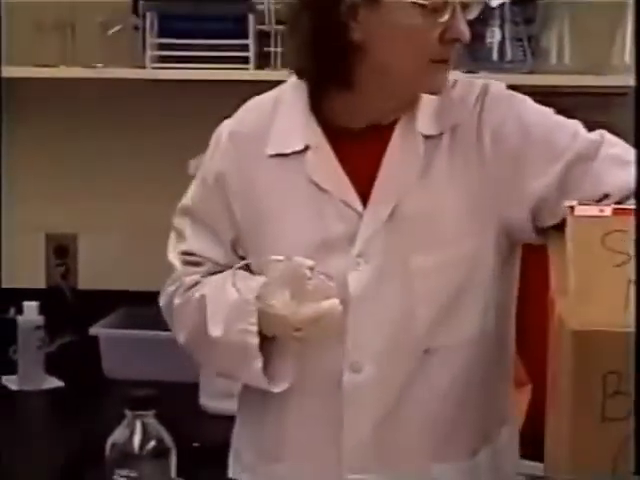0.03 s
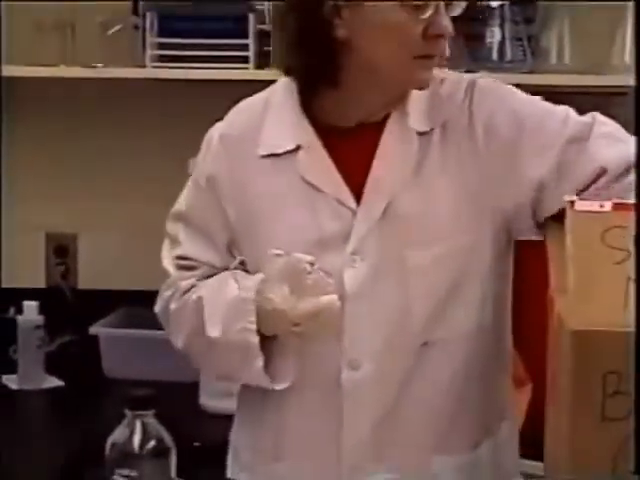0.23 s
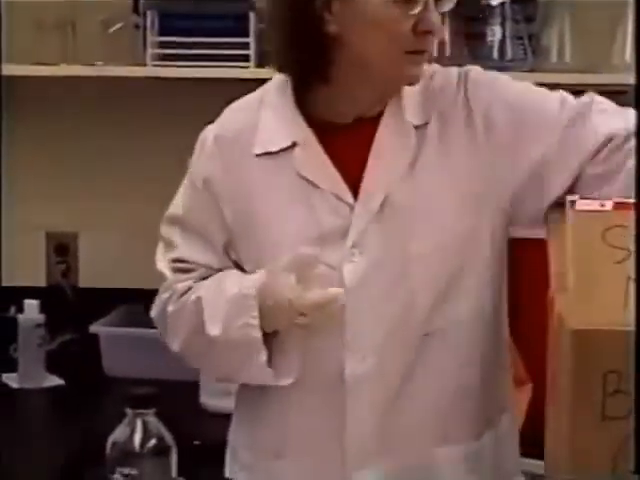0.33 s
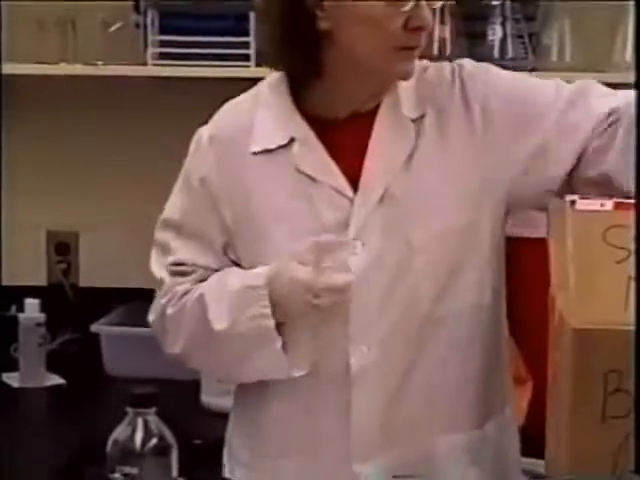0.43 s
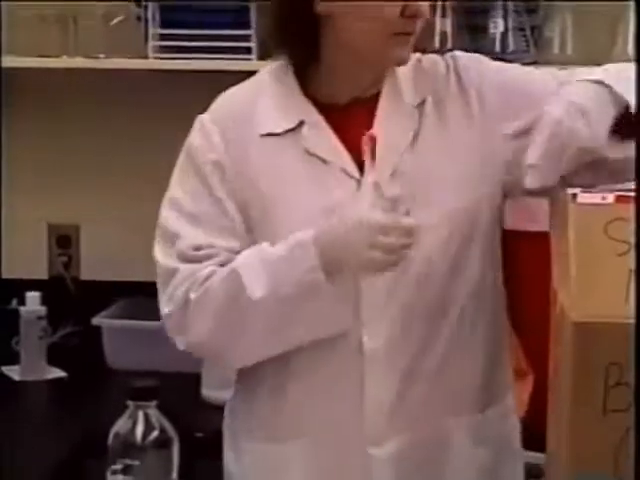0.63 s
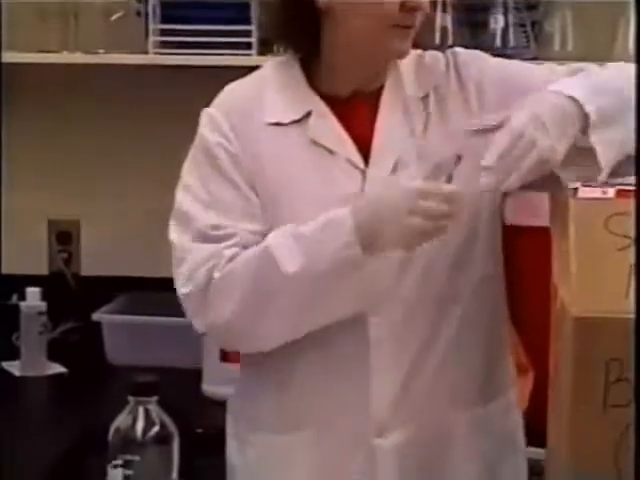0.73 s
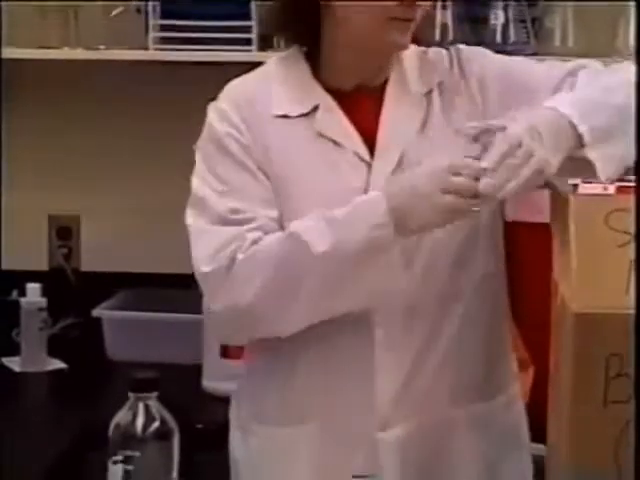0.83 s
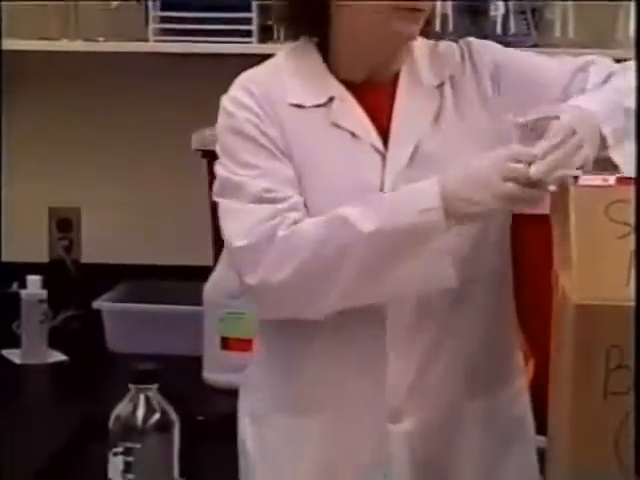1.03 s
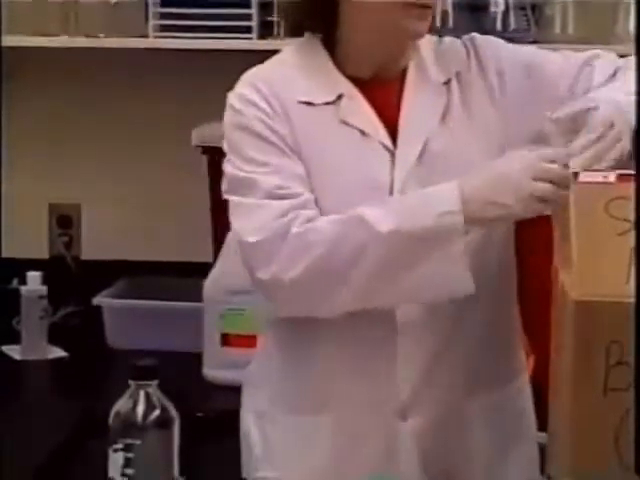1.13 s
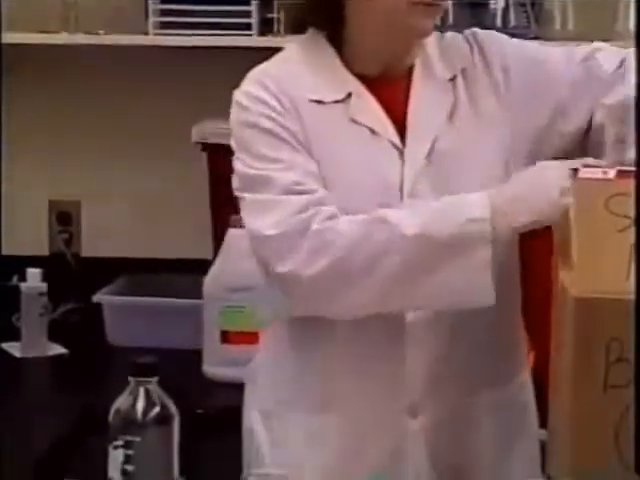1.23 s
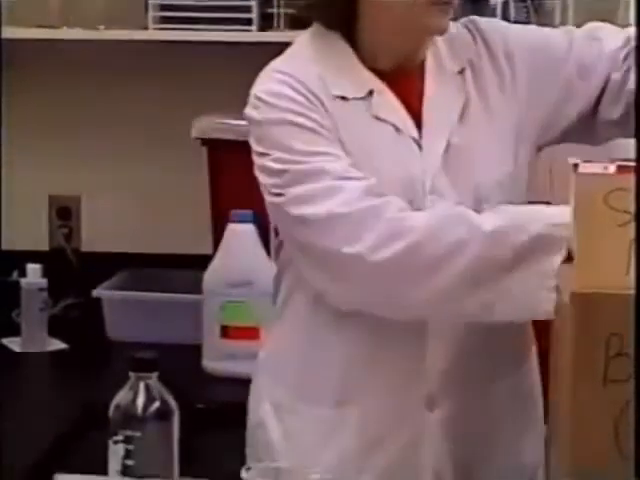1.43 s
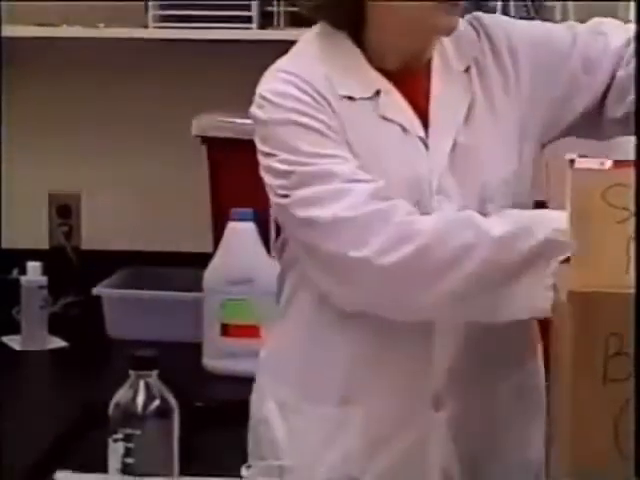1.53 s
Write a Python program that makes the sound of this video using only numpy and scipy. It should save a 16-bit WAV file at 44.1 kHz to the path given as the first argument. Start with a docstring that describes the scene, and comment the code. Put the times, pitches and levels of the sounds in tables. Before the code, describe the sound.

Glassware drops into a cardboard box. After a soft sleeve swish, hollow knocks and ringing clinks begin at about 0.2 seconds, are loudest near 0.35 and settle by 0.6. A faint rustle follows, then two small glassy ticks with light glove rubbing at about 0.9 and 1.0 seconds. Low ventilation hums throughout in the slightly echoing laboratory.

```python
"""Hard-walled laboratory: a piece of glassware is dropped into a tall cardboard waste box.
A sleeve swishes; the glass thumps down through the box, whose walls boom, rings on other glass
and is damped as it settles. Two small glassy ticks follow as gloved hands take the next item.
Ventilation hums throughout."""
import sys
import numpy as np
from scipy import signal
from scipy.fft import rfft, irfft
from scipy.io import wavfile

SR = 44100
rng = np.random.default_rng(int(sys.argv[2]) if len(sys.argv) > 2 else 0)


def unload_audio(sound):
    """Save the sound as a 16-bit wav file, at the path given as the first command line argument."""
    columns = np.transpose(np.atleast_2d(sound))
    # keep every value between -1 and 1, then stretch to whole-number steps
    steps = np.round(np.clip(columns, -1, 1) * 32767)
    wavfile.write(sys.argv[1], SR, steps.astype(np.int16))


N = 70560
T = np.arange(N) / SR

# knocks on box and contents: t/s, level/dB, treble slope/(dB/oct), boom/dB, boom f/Hz, thump/dB
BOX_KNOCKS = [(.193, -16.5, -3, -20, 292.5, -60), (0.208, -22, -0.5, -32, 285, -61),
              (0.236, -17, -2.5, -17.5, 234.3, -50), (.249, -22, 2.3, -37.5, 243, -28),
              (0.346, -8.5, -0.04, -15, 262, -33.5), (.361, -13, 0.57, -25, 268.6, -40),
              (0.398, -29.5, 2, -27, 286, -52), (.435, -22, 1, -18.5, 268.3, -54),
              (.45, -22.5, 2.5, -21.5, 272.6, -49), (.483, -21, -26, -43, 270, -65),
              (0.507, -28, -13, -24.5, 278.7, -68), (0.549, -33.5, -17, -36, 262, -49)]
# room decay: f/Hz, t60/s
ROOM_DECAY = [(100, 0.78), (500, 0.51), (2000, 0.53), (9000, 0.33)]


def from_db(db):
    """Decibels to gain."""
    return 10 ** (np.asarray(db) / 20)


def at_hz(points, hz):
    """Interpolate a table over log frequency."""
    table_hz, values = np.transpose(points)
    return np.interp(np.log(hz), np.log(table_hz), values)


def noise_bands():
    """Third-octave noise: centres/Hz, widths/Hz, unit-rms signals."""
    edges = np.geomspace(22, 11300, 28)
    hz = np.fft.rfftfreq(N, 1 / SR)
    white = rfft(rng.standard_normal(N))
    bands = np.array([irfft(white * ((hz >= lo) & (hz < hi)), N) for lo, hi in zip(edges, edges[1:])])
    return np.sqrt(edges[1:] * edges[:-1]), np.diff(edges), bands / bands.std(axis=1, keepdims=True)


def band_gains(colour, hz, width_hz, tilt_db_oct=0):
    """Band gains of unit total power from a colour (f/Hz, relative density/dB)."""
    gains = from_db(at_hz(colour, hz) + tilt_db_oct * np.log2(hz)) * np.sqrt(width_hz)
    return gains / np.linalg.norm(gains)


def strike(start_s, rise_s, t60_s):
    """Envelope: fast rise, exponential decay."""
    age_s = np.maximum(T - start_s, 0)
    return (1 - np.exp(-age_s / rise_s)) * np.exp(-np.log(1000) * age_s / t60_s)


def tone(hz, zero_phase_s, waver, width_hz):
    """Sine of rms near 1; amplitude and phase waver among reflections."""
    offset_hz = np.fft.fftfreq(N, 1 / SR)
    white = rng.standard_normal(N) + 1j * rng.standard_normal(N)
    drift = np.fft.ifft(np.fft.fft(white) / (1 + (offset_hz / width_hz) ** 2))
    carrier = np.exp(2j * np.pi * hz * (T - zero_phase_s))
    return np.sqrt(2 / (1 + waver ** 2)) * np.imag((1 + waver * drift / drift.std()) * carrier)


def room(x):
    """Diffuse reverberation off the hard walls."""
    hz, width_hz, bands = noise_bands()
    tail = 0
    for band, band_hz, t60_s in zip(bands, width_hz, at_hz(ROOM_DECAY, hz)):
        decay = strike(0.004, 0.012, t60_s) / np.linalg.norm(strike(0.004, 0.0025, t60_s))
        tail += band * np.sqrt(2 * band_hz / SR) * decay
    return signal.fftconvolve(x, tail)[:N]


def ventilation():
    """Steady air noise and two fan tones."""
    # air noise and hiss: f/Hz, relative density/dB
    air_colour = [(15, -34), (25, -13.5), (60, -20), (106, -13), (237, -7), (268, -15.5), (297, 5.5),
                  (328, -27.5), (371, -12.5), (628, -13), (960, -17.5), (1110, -15.5), (9800, -34),
                  (12700, -86), (21600, -120)]
    # fan tones: f/Hz, level/dB
    fan_tones = [(296.5, -53), (1422, -60.5)]
    hz, width_hz, bands = noise_bands()
    air = from_db(-45.5) * (band_gains(air_colour, hz, width_hz) @ bands)
    return air + sum(from_db(db) * tone(fan_hz, 0, waver=0.16, width_hz=2.3) for fan_hz, db in fan_tones)


def rustles(scatter_db=2.0):
    """Sleeve and gloves rub: noise bursts that swell and fade."""
    # rubs: peak t/s, level/dB, rise/s, t60/s, tilt/(dB/oct)
    rubs = [(0.093, -34.5, 0.096, 0.41, -6.5), (.68, -42, .05, .4, -4.5), (0.893, -36, 0.0036, 0.34, -1),
            (0.991, -41.5, 0.0025, 0.31, 1.4), (1.003, -48, 0.0044, 0.4, -3.5)]
    # cloth and rubber friction: f/Hz, relative density/dB
    rub_colour = [(25, -52), (120, -27.5), (400, -6.5), (1000, -9.5), (1800, -2.5), (3100, -3), (5000, -1),
                  (7000, -6.5), (10000, -5.5)]
    hz, width_hz, bands = noise_bands()
    out = 0
    for peak_s, db, rise_s, t60_s, tilt_db_oct in rubs:
        swell = np.exp(2 * np.minimum(T - peak_s, 0) / rise_s)
        fade = from_db(-60 * np.maximum(T - peak_s, 0) / t60_s)
        gains = band_gains(rub_colour, hz, width_hz, tilt_db_oct)
        gains *= from_db(scatter_db * rng.standard_normal(len(hz)))
        out += from_db(db) * swell * fade * (gains @ bands)
    return out


def ticks(bump_db=-48):
    """Small glass pieces touch: a thin ring over a soft low bump of the hands."""
    # touches: t/s, level/dB, tilt/(dB/oct)
    touches = [(.891, -38, 2.5), (.991, -48, 11)]
    # modes of the pieces: f/Hz, relative level/dB, t60/s
    modes = [(1583, -11, .45), (2570, 1, .16), (3052, 1, .26), (3171, -7, .22), (3566, -6, .32),
             (3909, -5, .22), (4227, -10, .35), (4620, -8, .25), (4940, -4, .2), (6174, -8, .25),
             (7275, -8, .2)]
    pivot_hz, first_s = modes[2][0], touches[0][0]
    ring = 0
    for hz, mode_db, t60_s in modes:
        octaves = np.log2(hz / pivot_hz)
        envelope = sum(from_db(db + mode_db + tilt_db_oct * octaves) * strike(t_s, 0.0035, t60_s)
                       for t_s, db, tilt_db_oct in touches)
        ring += envelope * tone(hz, first_s, waver=1.0, width_hz=58)
    hz, width_hz, bands = noise_bands()
    bump = band_gains([(25, -1), (60, -1), (150, -18), (500, -64)], hz, width_hz) @ bands
    return ring + from_db(bump_db) * bump * sum(strike(t_s, 0.0032, 0.27) for t_s, *_ in touches)


def bottle(struck_s=0.349):
    """A bottle lying in the box rings with the heaviest knock."""
    # bottle modes: f/Hz, level/dB, t60/s
    modes = [(1031, -22, 0.56), (1218, -21.5, 0.18), (2050, -18, 0.2), (2106, -23.5, 0.21)]
    return sum(from_db(db) * strike(struck_s, 0.0044, t60_s) * tone(hz, struck_s, waver=0.45, width_hz=25)
               for hz, db, t60_s in modes)


def box(room_db=-11):
    """The struck wall booms, higher modes join in and the whole box thumps."""
    # higher box modes: f/Hz, level re knock/dB, t60/s
    modes = [(403.5, -12.5, 0.18), (493.5, -12.5, 0.093), (612.6, -6, 0.12), (745, -10.5, 0.073),
             (863.3, -13.5, 0.27), (929, -8.5, 0.1), (1106.4, -12, 0.079)]
    hz, width_hz, bands = noise_bands()
    thump_colour = [(25, -7), (70, -17.5), (130, -6.5), (250, -10), (800, -70)]
    thump = band_gains(thump_colour, hz, width_hz) @ bands
    out = 0
    for t_s, _, _, boom_db, boom_hz, thump_db in BOX_KNOCKS:
        boom = tone(boom_hz, t_s, waver=0.21, width_hz=28)
        out += from_db(boom_db) * strike(t_s, rise_s=0.0028, t60_s=0.22) * boom
        out += from_db(thump_db) * strike(t_s, rise_s=0.0064, t60_s=0.33) * thump
    for mode_hz, mode_db, t60_s in modes:
        power = sum((from_db(db + mode_db) * strike(t_s, 0.0025, t60_s)) ** 2
                    for t_s, db, *_ in BOX_KNOCKS)
        out += np.sqrt(power) * tone(mode_hz, 0, waver=0.27, width_hz=16)
    return out + from_db(room_db) * room(out)


def knocks(rise_s=0.00072, crack_gain=0.28, treble_from_hz=590, room_db=-2.5):
    """Impacts excite dense, short-lived modes of cardboard and contents; hardness sets the treble."""
    # knock spectrum: f/Hz, relative density/dB
    knock_colour = [(60, -40), (140, -15.5), (230, -2.5), (450, -3), (700, -1), (1000, -3), (1550, -7.5),
                    (2200, -8.5), (3000, -15), (5000, -21), (7000, -26), (10000, -34)]
    hz, width_hz, bands = noise_bands()
    colour_gains = band_gains(knock_colour, hz, width_hz)
    treble_oct = np.log2(np.maximum(hz / treble_from_hz, 1))
    band_power = 0
    for t_s, db, slope_db_oct, *_ in BOX_KNOCKS:
        gains = from_db(db + slope_db_oct * treble_oct) * colour_gains
        envelope = strike(t_s, rise_s, t60_s=0.18) + crack_gain * strike(t_s, rise_s, t60_s=0.01)
        band_power += np.outer(gains, envelope) ** 2
    direct = (bands * np.sqrt(band_power)).sum(axis=0)
    return direct + from_db(room_db) * room(direct)


def glass(rest_s=0.595, damping_db_per_s=328, room_db=-10):
    """The dropped glass rings until it lies still; the place of contact weights its modes."""
    # glass modes: f/Hz, t60/s, rim-struck level/dB, side-struck level/dB
    modes = [(1859.5, .15, 2, -26), (1857.8, .85, -9, -27), (1820, .22, -16, -34), (3491, .4, -22, -13),
             (3560, .26, -21, -19), (3655, .24, -26, -20), (3718, .33, -13, -16), (3733, .33, -26, -9),
             (3778, .22, -23, -22), (4630, .3, -45, -26), (5995, .18, -27, -42), (6044, .25, -17, -38),
             (6410, .2, -33, -36), (6482, .33, -46, -27), (7165, .3, -52, -33), (7375, .28, -40, -40),
             (8350, .25, -35, -32), (8683, .2, -39, -40), (9160, .21, -32, -42)]
    # clinks: t/s, level/dB, place (0 rim, 1 side)
    clinks = [(0.2461, -3, 0.045), (.348, -18, 0), (0.432, -8.5, 0.75)]
    base_hz, first_s = modes[0][0], clinks[0][0]
    damping = from_db(-damping_db_per_s * np.maximum(T - rest_s, 0))
    out = 0
    for hz, t60_s, rim_db, side_db in modes:
        ratio = hz / base_hz   # higher modes rise sooner and waver more
        power = 0
        for t_s, db, place in clinks:
            gain = from_db(db + rim_db + place * (side_db - rim_db))
            power += (gain * strike(t_s, 0.013 / ratio, t60_s) * damping) ** 2
        out += np.sqrt(power) * tone(hz, first_s, waver=0.25 * ratio, width_hz=45 * np.sqrt(ratio))
        # the room carries each mode on as a fluttering echo
        pole = from_db(-60 / (at_hz(ROOM_DECAY, hz) * SR)) ** 2
        echo_power = signal.lfilter([1 - pole], [1, -pole], power)
        out += from_db(room_db) * np.sqrt(echo_power) * tone(hz, 0, waver=1.5, width_hz=60)
    return out


def scene():
    """Mono sum of all sources."""
    return (knocks() + box() + bottle() + glass() + ticks() + rustles() + ventilation())[None]


def record(dry):
    """Soft clip, then steep low-pass."""
    cutoff_hz = 10050
    rounded = dry / (1 + dry ** 6) ** (1 / 6)
    return signal.fftconvolve(rounded, signal.firwin(601, cutoff_hz, fs=SR)[None], "same")


dry = scene()
out = record(dry)
unload_audio(out)
```